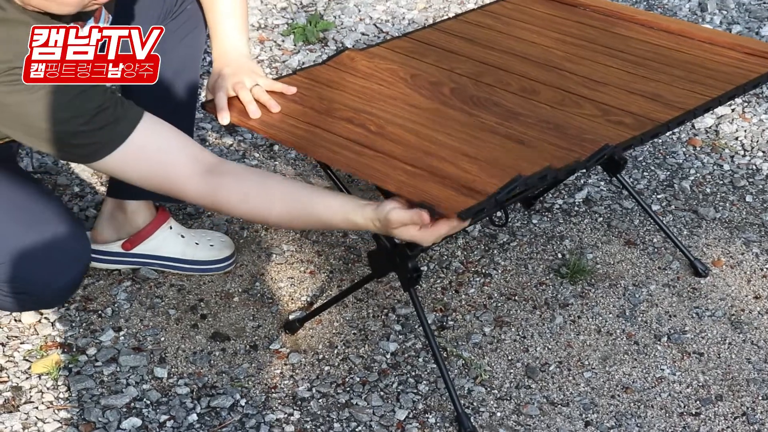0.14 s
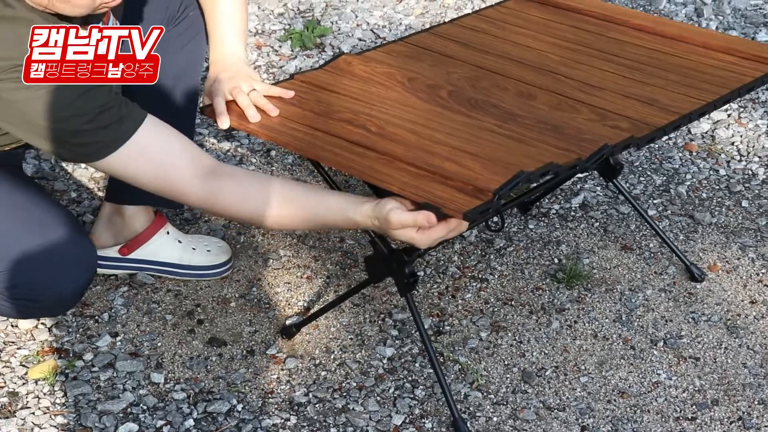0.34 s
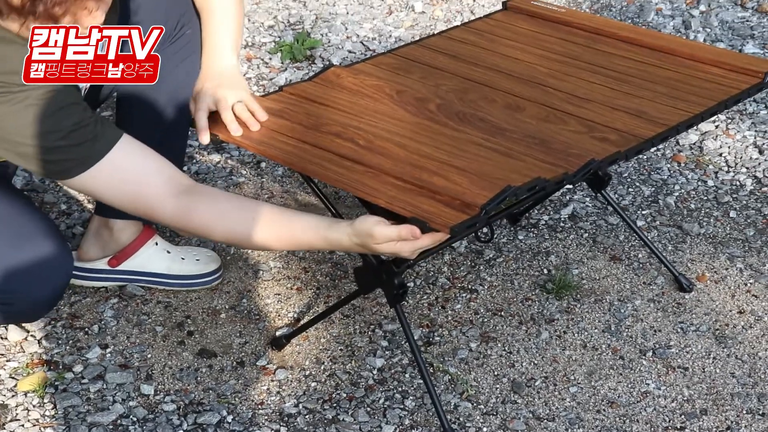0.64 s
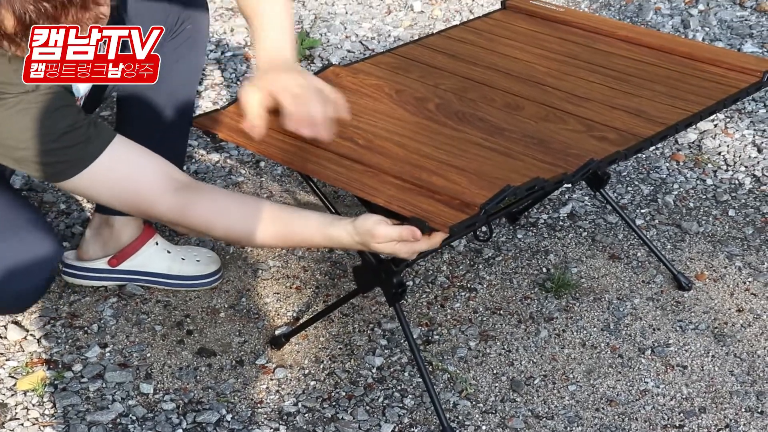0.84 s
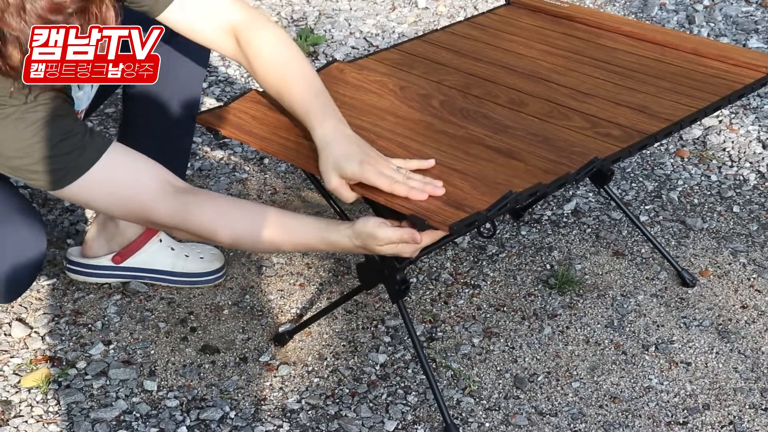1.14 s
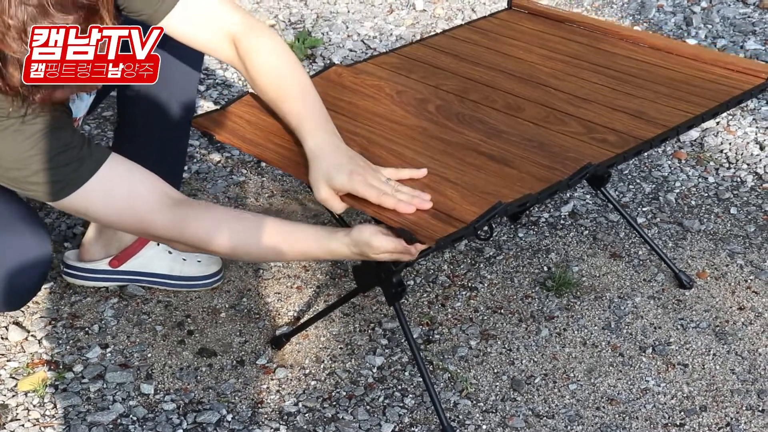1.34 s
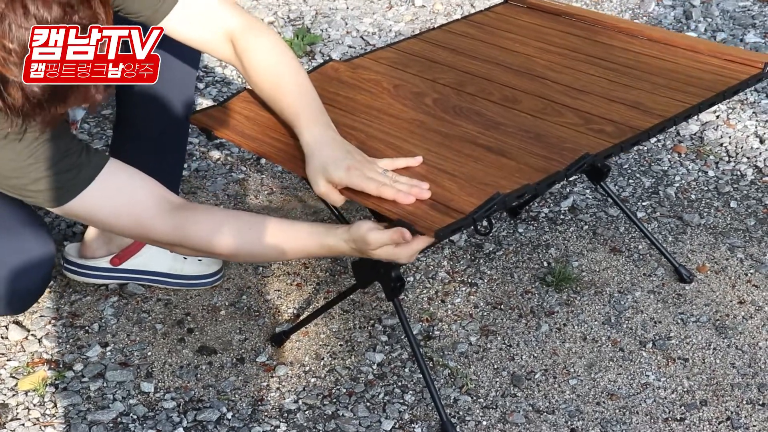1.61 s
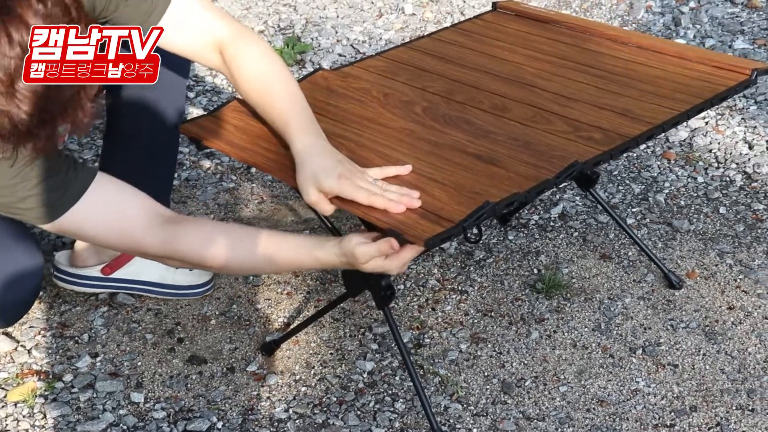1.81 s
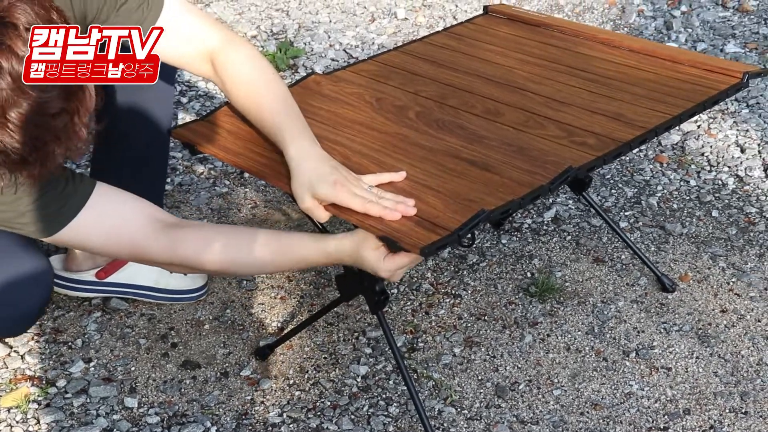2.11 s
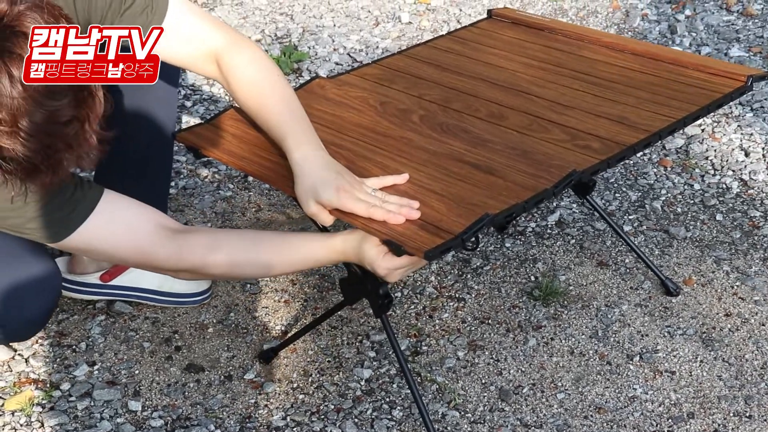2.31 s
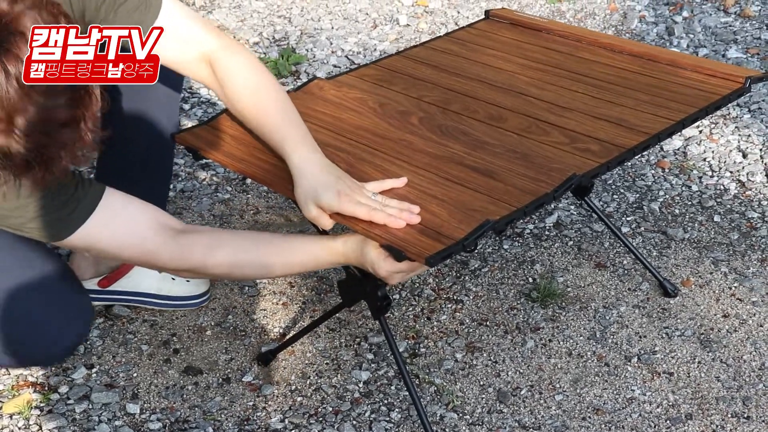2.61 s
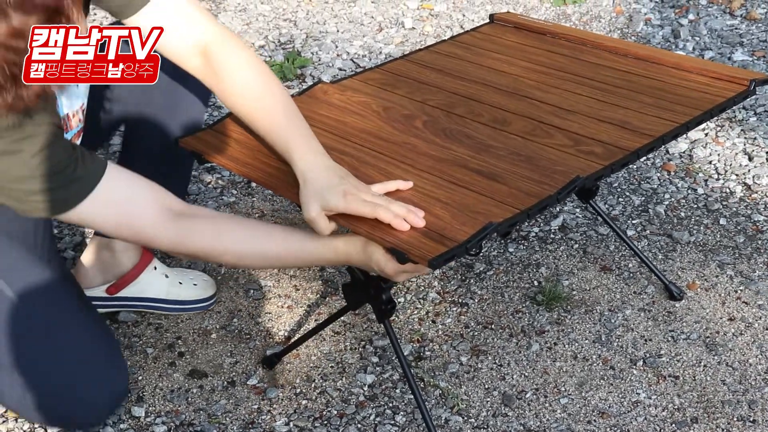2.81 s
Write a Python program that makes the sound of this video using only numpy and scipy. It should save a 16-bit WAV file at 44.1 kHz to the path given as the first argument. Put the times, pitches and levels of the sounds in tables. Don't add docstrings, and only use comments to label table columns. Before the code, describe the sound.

Metal slats of a roll-up camping table knock sharply into place, then tick softly amid rumbling wind

```python
import sys
import numpy as np
from scipy import signal
from scipy.fft import rfft, irfft
from scipy.io import wavfile
from scipy.ndimage import uniform_filter1d

SR = 44100
rng = np.random.default_rng(int(sys.argv[2]) if len(sys.argv) > 2 else 0)


def unload_audio(sound):
    columns = np.transpose(np.atleast_2d(sound))
    steps = np.round(np.clip(columns, -1, 1) * 32767)
    wavfile.write(sys.argv[1], SR, steps.astype(np.int16))


def boost_factor(decibels):
    exponent = np.asarray(decibels, float) / 20
    return 10 ** exponent


N = 130095


def evened(x):
    return x / np.sqrt(np.mean(x ** 2) + 1e-20)


def read(points, hz):
    f, db = np.transpose(points)
    f = np.r_[f[0] / 2, f, f[-1] * 2]
    db = np.r_[db[0] - 20, db, db[-1] - 20]
    return np.interp(np.log(hz + 1), np.log(f + 1), db)


def curve(points, t, column=1):
    columns = np.transpose(points)
    return np.interp(t, columns[0], columns[column])


def add(mix, time_s, sound):
    part = mix[round(time_s * SR):][:len(sound)]
    part += sound[:len(part)]


def colour(x, db_of_hz):
    hz = np.fft.rfftfreq(len(x), 1 / SR)
    return irfft(rfft(x) * boost_factor(db_of_hz(hz)), len(x))


def slow(count, size):
    drift = uniform_filter1d(rng.standard_normal(count), size)
    return evened(uniform_filter1d(drift, size))


def contacts(count, per_s, spread_db):
    struck = rng.random(count) < per_s / SR
    size = np.minimum(rng.exponential(1, count), 3)
    sign = rng.choice([-1., 1.], count)
    return struck * sign * boost_factor(spread_db * size)


# (frequency [Hz], level [dB], t60 [s])
SLAT_MODES = [(228, -1, 0.15), (427, -7, 0.014), (590, 1.5, 0.11), (916, -0.5, 0.16), (1047, -10.5, 0.49),
              (1150, -6.5, 0.35), (1265, -9, 0.28), (1330, -9, 0.43), (1660, -22, 0.031),
              (1930, -25, 0.069), (2366, -3, 0.061), (2810, -9.5, 0.029), (3570, -12.5, 0.013),
              (5320, -23, 0.029)]
# (frequency [Hz], density [dB per Hz])
CRACK_SPECTRUM = [(200, -14.5), (420, -3.5), (1100, 5.5), (2000, 0), (3100, -5.5), (5200, -14),
                  (7800, -26.5), (16000, -37)]
LEAD_S = .002
MODE_SPREAD, RING_DB = 0.0071, -1.5
FAVOUR_DB, FAVOUR_OCT, SOFT_FAVOUR = 7, 0.22, 0.17
CONTACTS_PER_S, CONTACT_DB = 6000, 1.5
FIRST_BLOW_DB, BLOW_T60_S = -7.5, 0.0069
HARD_BLOW, SOFT_RISE = 0.23, 0.086
EDGE_FROM_HZ, EDGE_TO_HZ = 1800, 7100
PUSH_DB, THIN_BELOW_HZ = -1.5, 200
RATTLE_DB, RATTLE_T60_S, RATTLE_HZ = -11, 0.33, 2970


def slat_ring(t):
    hz, db, t60 = np.transpose(2 * SLAT_MODES)[:, :, None]
    hz = hz * (1 + MODE_SPREAD * np.sqrt(hz / 1000) * rng.standard_normal(hz.shape))
    return (boost_factor(db - 60 * t / t60) * np.sin(2 * np.pi * hz * (t - t[0]))).sum(0)


def knock(peak_db, favour_hz, chatter_s, edge_db, rise_s):
    t = np.arange(8192) / SR - LEAD_S
    ring = slat_ring(t)
    rise = np.clip(t / rise_s * boost_factor(SOFT_RISE * min(edge_db, 6)), 0, 1)

    chatter = boost_factor(-60 * t / max(chatter_s, .005))
    first_blow = boost_factor(FIRST_BLOW_DB + HARD_BLOW * edge_db - 60 * t / BLOW_T60_S)
    hits = boost_factor(PUSH_DB) + evened(contacts(len(t), CONTACTS_PER_S, CONTACT_DB))
    hits = hits * rise * (chatter + first_blow)
    favour_db = FAVOUR_DB - SOFT_FAVOUR * edge_db
    hits = colour(hits, lambda f: favour_db * np.exp(-(np.log2(f / favour_hz + 1e-9) / FAVOUR_OCT) ** 2))

    rattle = rng.standard_normal(len(t)) * rise * boost_factor(RATTLE_DB - 60 * t / RATTLE_T60_S)
    rattle = rattle * np.cos(np.pi / 2 * t / t[-1])
    rattle = colour(rattle, lambda f: -10 * np.log10(1 + (f / RATTLE_HZ) ** 4))

    def edge(f):
        return edge_db * np.log2((1 + (f / EDGE_FROM_HZ) ** 2) / (1 + (f / EDGE_TO_HZ) ** 2)) / 4

    drive = colour(hits + rattle, edge)
    rung = evened(signal.fftconvolve(drive, ring)[:len(t)])
    crack = evened(colour(drive, lambda f: read(CRACK_SPECTRUM, f)))
    sound = boost_factor(RING_DB) * rung + crack
    sound = colour(sound, lambda f: -10 * np.log10(1 + (THIN_BELOW_HZ / (f + 1)) ** 8))
    return boost_factor(peak_db) * sound / np.sqrt(uniform_filter1d(sound ** 2, size=200).max())


# (time [s], peak [dB], favoured pitch [Hz], chatter t60 [s], edge [dB])
SNAPS = [(.207, -16, 1050, 0.1, -7.5), (.258, -16.5, 1940, 0.077, 8), (.309, -17, 1240, 0.1, 10),
         (.344, -25, 1270, 0.2, 4.5), (0.375, -26.5, 1310, 0.066, -3), (.485, -30, 970, 0.088, -8),
         (0.506, -30, 1240, 0.086, 2), (1.08, -33.5, 1250, 0.073, -4), (1.106, -20, 1680, 0.1, 11.5),
         (1.172, -31, 1340, 0.11, -4), (1.357, -24.5, 905, 0.12, 5), (1.371, -23, 975, 0.28, -5),
         (1.402, -22.5, 2100, 0.13, 15.5), (1.433, -24, 1500, 0.085, 5), (1.598, -31.5, 914, 0.12, -23),
         (1.619, -34, 960, 0.17, -11), (1.978, -32, 1380, 0.083, 6.5), (2.089, -33, 2440, 0.05, 28)]
# (time [s], peak [dB], favoured pitch [Hz], chatter t60 [s], edge [dB])
NUDGES = [(0.414, -30.5, 1130, 0.081, -10), (0.6, -40, 1230, 0.21, -16), (0.657, -36, 1190, 0.32, -6),
          (0.689, -37, 1250, 0.085, -10), (1.132, -35.5, 1150, 0.15, -9), (1.196, -38, 1340, 0.095, -10),
          (1.32, -39.5, 1350, 0.28, -8), (1.463, -52, 1103, 0.079, -12), (1.644, -37.5, 945, 0.3, -10),
          (1.697, -41.5, 1220, 0.073, -8), (1.945, -41.5, 1250, 0.23, -8), (2.15, -45, 1150, 0.25, 2),
          (2.179, -44, 930, 0.11, -5), (2.248, -40, 1120, 0.059, 9), (2.345, -47, 1220, 0.07, 12),
          (2.414, -44.5, 960, 0.07, -12), (2.464, -41.5, 975, 0.029, -18), (2.622, -42, 1000, 0.28, 1),
          (2.639, -42.5, 1160, 0.45, 2)]
SNAP_RISE_S, NUDGE_RISE_S = .003, .012


def slat_knocks():
    mix = np.zeros(N)
    for events, rise_s in ((SNAPS, SNAP_RISE_S), (NUDGES, NUDGE_RISE_S)):
        for time_s, *row in events:
            add(mix, time_s - LEAD_S - rise_s / 2, knock(*row, rise_s))
    return mix


PING_RISE_S, PING_SAG_DB, PING_T60_S = 0.00193, -3, 0.019
TWIN_DB, TWIN_RATIO = -10, 1.07


def ping(peak_db, hz, held_s):
    t = np.arange(6000) / SR
    sag_db = PING_SAG_DB * np.minimum(t / held_s, 1)
    choke_db = -60 * np.maximum(t - held_s, 0) / PING_T60_S
    mode = np.sin(2 * np.pi * hz * t)
    twin = boost_factor(TWIN_DB) * np.sin(2 * np.pi * TWIN_RATIO * hz * t)
    return boost_factor(peak_db + sag_db + choke_db) * np.minimum(t / PING_RISE_S, 1) * (mode + twin)


# (time [s], peak [dB], pitch [Hz], held [s])
PINGS = [(.209, -14, 1118, 0.014), (.209, -43.5, 5230, 0.009), (0.265, -25.5, 1200, 0.037),
         (0.269, -30.5, 2720, 0.032), (0.309, -17.5, 2900, 0.0049), (0.334, -28, 1280, 0.034),
         (1.082, -33.5, 1150, 0.011), (1.978, -29.5, 2300, 0.0058), (1.372, -30, 1050, 0.023),
         (0.208, -24, 226, 0.024), (0.2586, -8.5, 2040, 0.0023), (.259, -25.5, 302, 0.0062),
         (0.31, -8.5, 1924, 0.0038), (.31, -21, 392, 0.01), (.316, -19, 1150, .016),
         (.36, -35.5, 590, 0.072), (1.108, -29.5, 624, 0.013), (1.108, -37, 2276, 0.011),
         (1.175, -27.5, 1270, 0.0065), (1.598, -32, 630, 0.012), (1.6, -36, 226, 0.034),
         (1.615, -39, 1730, 0.011), (2.09, -30.5, 2550, 0.0068), (2.765, -47.5, 893, 0.066)]


def slat_pings():
    mix = np.zeros(N)
    for time_s, *row in PINGS:
        add(mix, time_s - PING_RISE_S / 2, ping(*row))
    return mix


TICK_T60_S, TICK_TOP_HZ = .013, 12400
TICK_SLOPE_DB_PER_OCT, TICK_SNAP_DB = 19.5, 5.5


def tick(peak_db, hz, top_db):
    t = np.arange(1024) / SR
    grain = rng.standard_normal((2, len(t))) + boost_factor(TICK_SNAP_DB) * (t == 0)
    grain = np.roll(grain * boost_factor(-60 * t / TICK_T60_S), 44, axis=1)
    low = evened(colour(grain[0], lambda f: -TICK_SLOPE_DB_PER_OCT * abs(np.log2((f + 1) / hz))))
    top = evened(colour(grain[1], lambda f: -25 * abs(np.log2((f + 1) / TICK_TOP_HZ))))
    return boost_factor(peak_db - 13.5) * (low + boost_factor(top_db) * top)


# (time [s], peak [dB], pitch [Hz], top
# [dB])
TICKS = [(0.1835, -39, 1570, -13), (1.047, -34.5, 2060, -18), (2.6885, -25.5, 1910, -24),
         (2.726, -35, 2060, -19), (2.764, -29.5, 2050, -20), (2.7688, -26, 2100, -43),
         (2.9377, -30.5, 2200, -14),
         (0.374, -34, 3730, -26), (0.645, -40.5, 4500, -16), (0.7425, -40, 4200, -17),
        (1.619, -37.5, 3900, -17), (2.659, -36.5, 3744, -12), (2.698, -33, 4230, -20),
        (2.7124, -38, 4010, -15),
         (0.0102, -45, 6510, -1), (0.0537, -53, 6400, 4), (0.8684, -57, 7030, -6), (0.9042, -50, 6500, 3),
          (0.94, -44, 8550, -8), (1.048, -42, 6850, -14), (1.435, -35, 6150, -32), (1.4643, -39, 6460, -19),
          (2.053, -43, 6500, -20), (2.792, -40, 6350, -4),
         (2.344, -38, 2600, -20), (2.7, -34, 1700, -25), (2.671, -35, 2100, -25), (2.702, -38, 5300, -15),
           (2.776, -37, 2300, -30), (2.781, -39, 2000, -30), (2.789, -36, 2000, -25),
           (2.807, -37.5, 3300, -20), (2.822, -39, 4500, -14), (2.843, -43, 2600, -22),
           (2.912, -44, 1300, -25), (2.9252, -33, 1300, -25), (2.931, -38, 2100, -20),
           (2.944, -32.5, 3000, -16), (2.9485, -34, 1100, -15), (1.409, -22, 2300, -31),
           (1.414, -37, 4800, -26), (1.438, -33, 6000, -24), (.3155, -40, 4700, -6), (1.4, -28, 1200, -30),
           (2.623, -34, 1100, -25), (1.321, -33, 1360, -25), (.3097, -19.5, 3170, -12.5),
           (.261, -23.5, 4200, -12)]


def clicks():
    mix = np.zeros(N)
    for time_s, *row in TICKS:
        add(mix, time_s - .0015, tick(*row))
    return mix


# (time [s], level [dB], length [s])
RUSTLES = [(.905, -58, .035), (.95, -63, .04), (1.085, -60, 0.028), (1.125, -57, .05), (0.42, -59, 0.017),
           (2.8, -62, .08), (2.68, -64, .07)]
RUSTLE_HZ = 13000


def rustle():
    t = np.arange(N) / SR
    grains = evened(colour(contacts(N, 5000, 3), lambda f: -16 * abs(np.log2((f + 1) / RUSTLE_HZ))))
    swells = sum(boost_factor(db) * np.exp(-(2 * (t - s) / length_s) ** 2) for s, db, length_s in RUSTLES)
    return grains * swells


# (time [s], level [dB])
SHUFFLE = [
    (2.55, -71),
    (2.68, -47.5),
    (2.814, -49.5),
    (2.95, -44),
]
# (frequency [Hz], density [dB per Hz])
GRIT_SPECTRUM = [(290, -43), (500, 3), (946, -6), (1000, -1), (1130, 2.5), (2430, 1.5), (16000, -17)]
GRIT_PER_S, GRIT_DB = 2200, 4


def shuffle():
    t = np.arange(N) / SR
    grit = evened(colour(contacts(N, GRIT_PER_S, GRIT_DB), lambda f: read(GRIT_SPECTRUM, f)))
    return grit * boost_factor(curve(SHUFFLE, t)) * np.clip((t - SHUFFLE[0][0]) / 0.13, 0, 1)


# (time [s], level [dB], small eddies [dB])
GUSTS = [(0, -16.5, -1), (.1, -19.5, -3), (.17, -30.5, 7.5), (.4, -24, 3), (.49, -17.5, -2), (.57, -29, 8),
         (.7, -24.5, 2.5), (.93, -29, 3), (1.05, -36.5, 7), (1.3, -35, 0), (1.52, -31, -0.5),
         (1.83, -27.5, 3), (2.3, -30.5, 5.5), (2.44, -27, 5), (2.58, -16.5, -9.5), (2.68, -32.5, 12),
         (2.95, -17.5, -5.5)]
# (frequency [Hz], density [dB per Hz])
WIND_SPECTRUM = [(7.1, -7), (12, -2.5), (38, -5.5), (70, -16), (268, -33.5), (415, -52.5), (448, -58),
                 (500, -43.5), (650, -56), (1100, -120)]
EDDY_HZ, LUMPY_DB, SMALL_LUMPY_DB = 83.5, -0.5, 2.6


def wind():
    t = np.arange(N) / SR
    noise = evened(colour(rng.standard_normal(N), lambda f: read(WIND_SPECTRUM, f)))
    large = colour(noise, lambda f: -20 * np.log10(1 + (f / EDDY_HZ) ** 4))
    small = (noise - large) * boost_factor(curve(GUSTS, t, column=2) + SMALL_LUMPY_DB * slow(N, size=500))
    large = large / np.sqrt(uniform_filter1d(large ** 2, size=5000))
    large = large * boost_factor(LUMPY_DB * slow(N, size=900))
    return (large + small) * boost_factor(curve(GUSTS, t))


# (frequency [Hz], density [dB per Hz])
HISS_SPECTRUM = [(210, -12), (350, 1.5), (696, -0.5), (928, -4.5), (2270, -4.5), (2580, -8.5), (4180, -11),
                 (14800, -23.5), (16000, -19)]
HISS_DB, HISS_FOLLOWS_GUST = -46.5, 0.048
PATCHY_DB, SMOOTH_ABOVE_HZ = 3.5, 3000


def hiss():
    frames, hz = N // 128 + 5, np.fft.rfftfreq(512, 1 / SR)[:, None]
    real, imag, patches = rng.standard_normal((frames, 257, 3)).T
    patches = uniform_filter1d(patches, size=8, axis=0)
    patches = evened(uniform_filter1d(patches, size=16, axis=1))
    db = read(HISS_SPECTRUM, hz) + PATCHY_DB * patches / (1 + hz / SMOOTH_ABOVE_HZ)
    noise = signal.istft((real + 1j * imag) * boost_factor(db), nperseg=512, noverlap=384)[1]
    gust_db = curve(GUSTS, np.arange(N) / SR)
    return evened(noise[:N]) * boost_factor(HISS_DB + HISS_FOLLOWS_GUST * (gust_db + 11))


def scene():
    tabletop = slat_knocks() + slat_pings() + clicks() + rustle()
    return (tabletop + shuffle() + wind() + hiss())[None]


def low_pass(x):
    return signal.sosfilt(signal.butter(12, 16490, fs=SR, output="sos"), x)


# (frequency [Hz], gain [dB])
MIC_RESPONSE = [(1000, 0.5), (4500, 1), (5300, 3), (6000, -1), (6900, 4.5), (8000, -3), (12000, 0),
                (16000, -0.5)]
EDGE_HZ = 15730


def record(dry):
    f, db = np.transpose(MIC_RESPONSE)

    def response(hz):
        return np.interp(hz, f, db) - 80 * np.clip((hz - EDGE_HZ) / 200, 0, 1)

    mix = colour(np.pad(dry[0], 2048, "reflect"), response)
    return low_pass(mix[None, 2048:-2048])


dry = scene()
out = record(dry)
unload_audio(out)
```